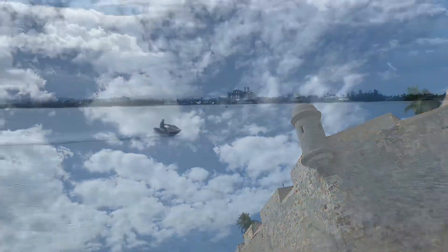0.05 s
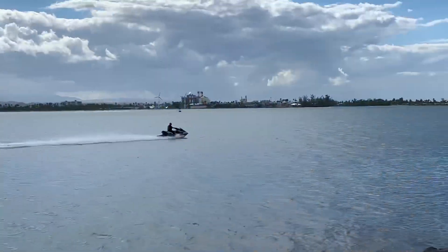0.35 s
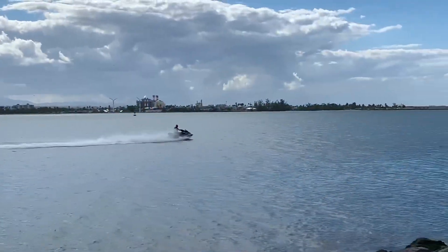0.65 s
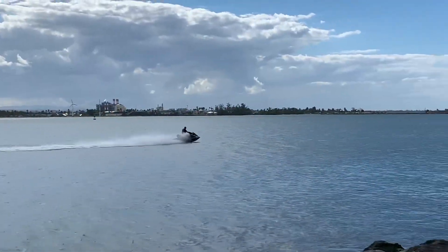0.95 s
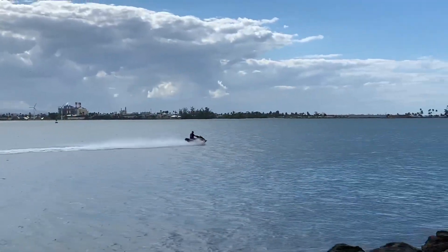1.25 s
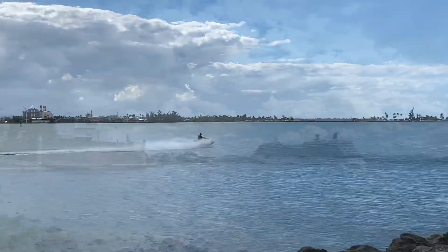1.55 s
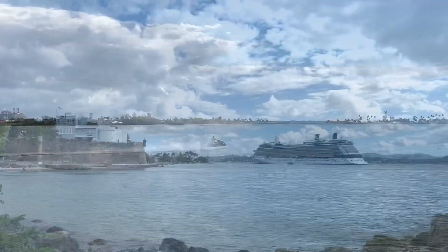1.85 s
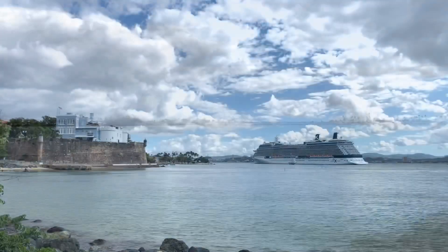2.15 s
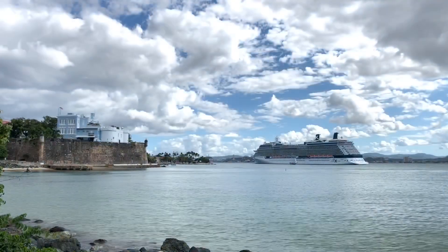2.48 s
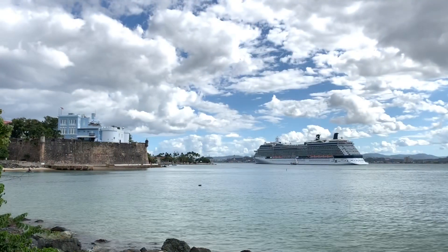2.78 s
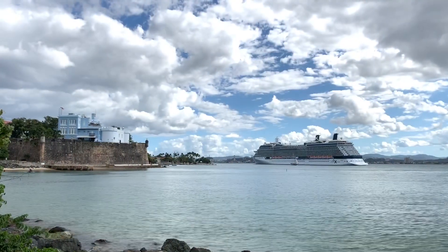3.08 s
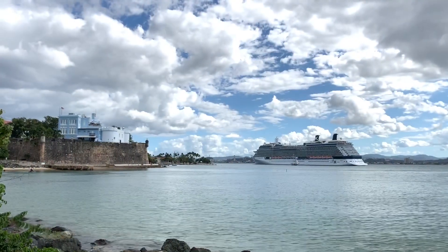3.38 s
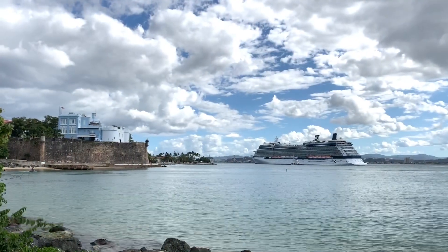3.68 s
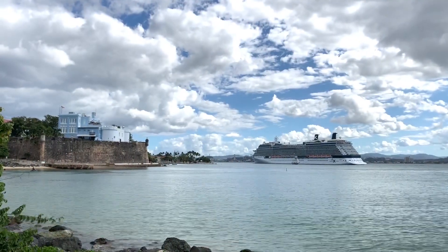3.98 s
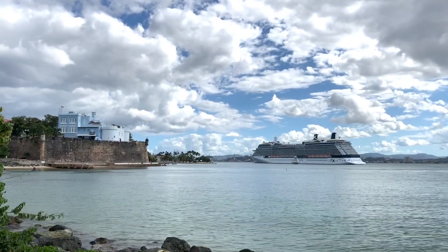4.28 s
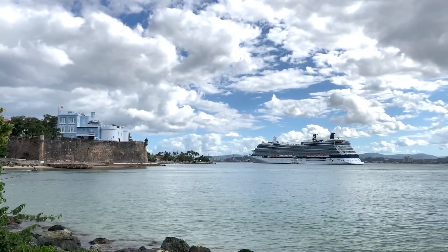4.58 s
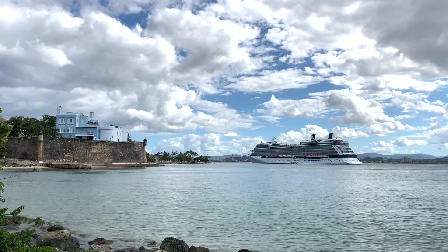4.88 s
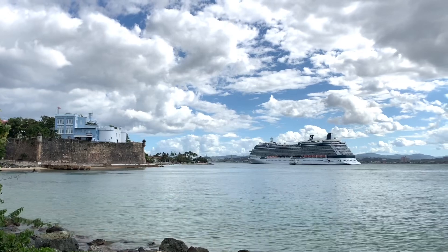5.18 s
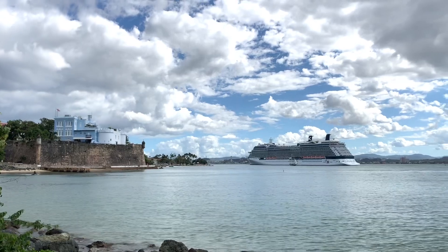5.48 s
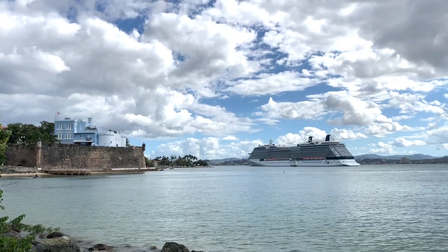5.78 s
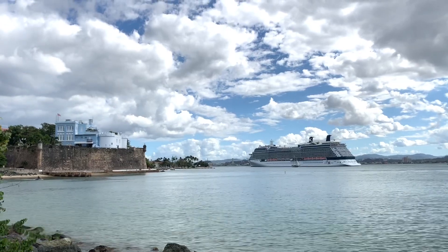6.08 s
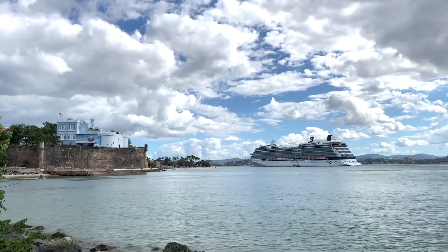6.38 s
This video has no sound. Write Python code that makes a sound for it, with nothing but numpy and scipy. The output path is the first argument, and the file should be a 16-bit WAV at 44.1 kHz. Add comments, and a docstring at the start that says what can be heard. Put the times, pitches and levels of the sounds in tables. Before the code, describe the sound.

A jet ski crosses a harbour with a wavering, rasping engine hum and a faint hiss of spray, while gusts rumble and thump on the microphone on shore. Just after two seconds the engine fades and the wind eases to a breeze. Distant ship engines drone low as small waves wash, fizz and drip among rocks. Around four seconds, a few hollow machinery notes swell and sink back.

```python
"""A three-cylinder jet ski crosses a harbour, each firing of its engine ringing the exhaust pipe,
while swirls of wind rumble and thump on the microphone on the shore. Just after two seconds the
jet ski fades and the gusts ease to a breeze. That uncovers the low drone of distant ship engines
and small waves that lap, fizz and drip among the rocks. At about four seconds a few hollow notes
swell out of the far machinery and sink back."""
import sys
import numpy as np
from scipy import signal
from scipy.fft import rfft, irfft, next_fast_len
from scipy.io import wavfile
from scipy.ndimage import uniform_filter1d, map_coordinates

SR = 44100
rng = np.random.default_rng(int(sys.argv[2]) if len(sys.argv) > 2 else 0)


def master(y):
    """Save y as 16-bit WAV."""
    cut = np.clip(np.atleast_2d(y).T, -1, 1)
    pcm = np.round(cut * 32767)  # scale
    wavfile.write(sys.argv[1], SR, pcm.astype(np.int16))


N = 284004


def amp(db):
    """Turn decibels into a number to multiply by."""
    return 10 ** (np.asarray(db) / 20)


def unit(x):
    """Scale a sound to an average size (rms) of 1."""
    return x / np.sqrt(np.mean(x ** 2) + 1e-20)


def along(points, hz):
    """Read between rows of (f/Hz, value) on a log frequency scale."""
    f, v = np.transpose(points)
    return np.interp(np.log(hz + 1), np.log(f + 1), v)


def curves(rows):
    """Join rows of (t/s, values...) with straight lines, one curve per value."""
    s, *cols = np.transpose(rows)
    return [np.interp(np.arange(N) / SR, s, c) for c in cols]


def swells(rows):
    """Smooth bumps from rows of (t/s, half length/s, heights...), one curve per height."""
    s, half, *heights = np.transpose(rows)
    return np.array(heights) @ np.exp(-((np.arange(N) / SR - s[:, None]) / half[:, None]) ** 2)


def wobble(rate):
    """A smooth curve through `rate` random values a second."""
    return map_coordinates(rng.standard_normal(int(N * rate / SR) + 4), [np.arange(N) * rate / SR])


def filtered(x, response):
    """Multiply each frequency in x by response(hz)."""
    m = next_fast_len(N + SR // 2)
    return irfft(rfft(x, m) * response(np.fft.rfftfreq(m, 1 / SR)), m)[..., :N]


def rush(spectrum, alike):
    """Stereo noise with a given tone colour and likeness between left and right (1 = the same)."""
    turn = lambda hz: np.arccos(np.clip(along(alike, hz), -1, 1)) / 2
    colour = lambda hz: amp(along(spectrum, hz)) / (1 + (hz / spectrum[-1][0]) ** 4) ** .5
    noise = rng.standard_normal((2, N))
    mid, side = filtered(noise, lambda hz: colour(hz) * [np.cos(turn(hz)), np.sin(turn(hz))])
    return np.array([mid + side, mid - side]) / np.std(mid)


def patchy(pair, depth_db, bands, frames):
    """Make random patches of pitch louder or softer for a few hundredths of a second."""
    grid = signal.stft(pair, nperseg=512)[2]
    patches = uniform_filter1d(rng.standard_normal(grid.shape[1:]), bands, axis=0)
    patches = uniform_filter1d(patches, frames, axis=1)
    return unit(signal.istft(grid * amp(depth_db * unit(patches)), nperseg=512)[1][:, :N])


def from_left(pair, lead_s):
    """Sound from the left reaches the left channel a little sooner."""
    return filtered(pair, lambda hz: np.exp(1j * np.pi * hz * lead_s * np.array([[1], [-1]])))


# the tones in the exhaust's hum: vibrations per engine cycle, level/dB
EXHAUST_TONES = [(3, -8), (4, -26.5), (5, -14), (6, 2), (7, -10), (8, -21), (9, -15.5), (10, -24),
                 (11, -37.5), (12, -32), (13, -29), (14, -27.5)]

def exhaust_note(cycles):
    """The fuel burns differently in each cycle, so the tones waver, the weak ones most."""
    note = np.zeros(N)
    for k, db in EXHAUST_TONES:
        level = amp(db + (.5 if db > -4 else 1.8) * wobble(13.88))
        note += level * np.sin(2 * np.pi * k * (cycles - .5) + .28 * wobble(30))
    return note * amp(.8 * wobble(70))


# the pitches at which the pipe rings: f/Hz, width/Hz, level/dB
PIPE_RINGS = [(680, 230, -1), (1040, 340, -4), (1440, 280, .5), (1790, 320, -0.5), (2310, 300, -4.5),
              (2950, 380, -10.5), (3820, 950, -15), (6300, 900, -28)]

def exhaust_pipe(f, gap_hz=1572, gap_width_hz=97):
    """How the pipe passes each frequency: steep peaks, deep valleys and one narrow gap."""
    peaks = sum((-1) ** k * amp(db) * (1j * f * width / (hz * hz - f * f + 1j * f * width)) ** 2
                for k, (hz, width, db) in enumerate(PIPE_RINGS))
    return peaks * (gap_hz ** 2 - f * f) / (gap_hz ** 2 - f * f + 1j * f * gap_width_hz)


def exhaust_rasp(cycles, scatter_db=1.8, jitter_s=.00003, hiss=.16, blast_s=.0016):
    """Each firing sends a blast down the pipe: part repeats every cycle, part is fresh gas noise."""
    t = np.arange(SR // 100) / SR
    blast = np.exp(-t / blast_s)
    drive = np.zeros((2, N))
    for k, db in enumerate([-12, -1, 1]):  # one weak cylinder, two strong: it rattles in pairs
        firings = np.flatnonzero(np.diff(np.floor(cycles - k / 3)))
        louder, later = rng.standard_normal((len(firings), 2)).T
        firings = np.clip(firings + jitter_s * SR * later, 0, N - 1).astype(int)
        pulses = np.bincount(firings, amp(db + scatter_db * louder), N)
        # each cylinder has its own blast shape, partly shared by left and right
        shape = blast * (rng.standard_normal(len(t)) + .5 * rng.standard_normal((2, len(t))))
        # even out its frequencies, so that the pipe alone colours it
        spectrum = rfft(shape)
        power = uniform_filter1d(np.abs(spectrum) ** 2, size=3, axis=1)
        flat = irfft(spectrum / np.sqrt(power), len(t))
        shape = unit(flat * np.sqrt(blast)) * np.sqrt(np.mean(blast ** 2))
        noise = rng.standard_normal(N) + 4.3 * rng.standard_normal((2, N))
        gas = signal.fftconvolve(pulses, blast)[:N] * noise
        drive += signal.fftconvolve(pulses[None], shape, axes=1)[:, :N] + hiss * gas
    return unit(filtered(drive, exhaust_pipe))


# strength of the exhaust's high tones: f/Hz, level/dB
HIGH_TONES = [(690, -10.5), (850, -24.5), (945, -18.5), (995, -12.5), (1060, -15), (1140, -16.5),
              (1195, -20), (1290, -15), (1440, -13.5), (1500, -14), (1590, -22), (1690, -17.5),
              (1790, -24.5), (1880, -18.5), (1950, -21.5)]
# a nasal ring that shifts as the outlet dips and lifts: t/s, f/Hz, rise/dB
NASAL_RING = [(.05, 1510, 1), (.2, 1460, -2), (.56, 1530, 8), (.61, 1460, 2), (.67, 1490, 7),
              (.77, 1327, -4), (.83, 1352, 8), (.88, 1494, 20), (.93, 1520, -13), (1.03, 1480, 12),
              (1.2, 1425, 1), (1.33, 1460, 7), (1.45, 1475, 6)]

def exhaust_overtones(cycles, cycle_hz, ring_width_hz=75):
    """The engine's high tones waver one by one and change level where the nasal ring passes."""
    ring_hz, rise_db = curves(NASAL_RING)
    tones = np.zeros(N)
    for k in range(15, 40):
        lift_db = rise_db * np.exp(-((k * cycle_hz - ring_hz) / ring_width_hz) ** 2)
        level = amp(along(HIGH_TONES, k * cycle_hz) + lift_db + 2.5 * wobble(16.34))
        tones += level * np.sin(2 * np.pi * k * cycles + .54 * wobble(12))
    throb = 1 + .8 * np.cos(2 * np.pi * (cycles - .15))  # loud during the two strong firings
    return .75 * tones * throb * amp(1.5 * wobble(60))


# engine firings a second, sagging and recovering over the waves: t/s, f/Hz
FIRING_RATE = [(0, 152.9), (.16, 146.1), (.25, 148.2), (.35, 147.2), (.46, 151.4), (.61, 150.5),
               (.72, 147.4), (.86, 150.3), (1.05, 148.3), (1.16, 144.9), (1.32, 147.9), (1.5, 151.2),
               (1.65, 147.8), (2.4, 149.6)]
# the jet ski goes by: t/s, note level/dB, rasp level/dB, treble aimed at the shore/dB
PASS_BY = [(0, -33, -45.5, -8), (.45, -29.5, -42.5, -8), (.75, -29, -42.5, -10.5), (1.15, -29, -44, -6.5),
           (1.41, -19, -38.5, 6), (1.65, -26, -44, -7.5), (1.88, -24.5, -48, -3.5), (1.97, -25, -51, 3.5),
           (2.04, -26, -49, -6.5), (2.12, -25.5, -54.5, -10), (2.22, -32.5, -58.5, -7),
           (2.45, -47.5, -64, -1)]
# the part of the rasp that is aimed backwards: f/Hz, share
AIMED_BACK = [(1800, 0), (2200, 0.6), (2450, 0.7), (3000, 0.7), (6000, 0)]
# hops bare the exhaust and throw spray: t/s, half length/s, rasp rise/dB, spray rise/dB
HULL_HOPS = [(.39, 0.052, 2.5, 8), (.53, 0.057, 5, 2.5), (.935, .03, 8.5, 3), (1.0, .012, 7.5, 8.5),
             (1.41, 0.12, 0.5, -1.5), (1.972, 0.024, 6, 1.5)]
# gusts on the way to the shore make the note waver: t/s, depth/dB
NOTE_WAVER = [(1.1, 2.5), (1.35, 0.7)]
# tone colour of the spray behind the hull: f/Hz, level/dB
WAKE_COLOUR = [(2000, -8), (3900, 4), (5300, -4), (6300, 1), (7400, -4), (8900, 0), (10200, -4),
               (11500, -9), (13500, -8), (15000, -14)]
# stereo image of sounds from the water: f/Hz, left-right likeness
HARBOUR_ALIKE = [(300, 0.96), (520, 0.76), (890, 1), (1520, 0.0094), (2600, 1), (4500, 0.051),
                 (9000, 0.035)]

def jet_ski():
    """A humming, rasping exhaust passes slightly to the left, trailing a hiss of spray."""
    firing_hz, = curves(FIRING_RATE)
    note_db, rasp_db, aimed_db = curves(PASS_BY)
    cycles = np.cumsum(firing_hz) / SR / 3  # three firings make one engine cycle
    note = exhaust_note(cycles)
    # spray and waves keep changing the rasp's colour
    rasp = patchy(exhaust_rasp(cycles), depth_db=4, bands=6, frames=12)
    # the pipe aims its treble backwards, so the rasp brightens as the craft goes by
    treble = filtered(rasp, lambda hz: np.clip(along(AIMED_BACK, hz), 0, 1))
    rasp += (amp(aimed_db) - 1) * treble
    rasp += exhaust_overtones(cycles - 1 / 3, firing_hz.mean() / 3)
    bared_db, thrown_db = swells(HULL_HOPS)
    waves_db = bared_db + .7 * wobble(20.88)  # waves cover and bare the outlet
    rasp *= amp(rasp_db + waves_db) * amp([[1.4], [-1.4]])
    note *= amp(note_db + curves(NOTE_WAVER)[0] * wobble(24.12))
    exhaust = from_left(note + rasp, lead_s=.00006)
    spray = amp(rasp_db - 20.5 + thrown_db) * rush(WAKE_COLOUR, HARBOUR_ALIKE)
    # a thin whistle grows as the tail turns towards the shore
    whistle_db, = curves([(.8, -97), (1.15, -70), (1.42, -71.5), (1.55, -84.5), (2, -89)])
    whistle = amp(whistle_db) * rush([(8200, -36.5), (8620, 5), (8780, 5), (9200, -48)], HARBOUR_ALIKE)
    fade_db, = curves([(2.18, 1), (2.35, -1.5), (2.55, -38)])
    return amp(fade_db) * (exhaust + spray + whistle)


# wind strength at the microphone: t/s, level/dB
WIND_STRENGTH = [(0, -24), (.09, -25.5), (.3, -20), (.65, -20.5), (1.2, -22.5), (1.45, -26), (1.75, -30.5),
                 (2.3, -36.5), (2.75, -40), (3.1, -36.5), (3.7, -38.5), (4.25, -31.5), (5.1, -32.5),
                 (6.4, -31.5)]
# gusts on top of it: t/s, half length/s, rumble rise/dB, tearing rise/dB
GUST_RISES = [(.15, 0.048, 1.5, 9.5), (.28, 0.03, 1.5, 5), (.43, 0.057, 0, 6), (.755, 0.022, 5.5, 4.5),
              (.91, 0.029, 1, -1), (1.1, 0.085, 1, 4), (1.205, 0.035, 3.5, 6.5), (1.975, 0.031, 8, 6.5),
              (4.24, 0.045, 4, 2), (4.54, 0.023, 10, 7)]
# tone colours of the wind's four noises: f/Hz, level/dB
GUST_COLOUR = [(12, -20), (28, -1.5), (58, 2), (100, -1.5), (150, -6), (250, -26), (500, -62)]
FLUTTER_COLOUR = [(70, -21), (140, 0.5), (210, 0), (270, 0.5), (340, -1), (390, -11.5), (460, -17),
                  (800, -32.5)]
TEARING_COLOUR = [(120, -8), (300, -2), (450, 2.5), (700, -4.5), (1100, -11), (2000, -19.5), (4000, -35),
                  (9000, -68.5)]
BREEZE_COLOUR = [(12, -22), (28, -6), (45, -0.5), (64, 0), (85, -4.5), (115, -3), (160, -13.5), (250, -23),
                 (500, -57)]
# stereo image of strong and light wind: f/Hz, left-right likeness
STRONG_ALIKE = [(60, 0.91), (300, 0.89), (520, 0.93), (900, 0.1), (1600, 0.16)]
LIGHT_ALIKE = [(60, 0.91), (140, 0.9), (300, 0.98), (520, 0.94)]
# the breeze flutters harder for a moment: t/s, half length/s, rise/dB
FLUTTER_RISE = [(4.75, 0.22, 5)]

def wind():
    """Swirls of air rumble and flutter on the microphone; tearing gusts give way to a breeze."""
    strength_db, = curves(WIND_STRENGTH)
    gust_db, tear_db = swells(GUST_RISES)
    swirls = wobble(35)
    excess_db = strength_db + 21  # flutter and tearing grow faster than the wind itself
    flutter_db = -24 + 1.26 * excess_db + .6 * gust_db + 2.7 * swirls
    tearing_db = -35.5 + 1.24 * excess_db + tear_db + 1.3 * swirls
    gusts = amp(strength_db + gust_db + .24 * swirls) * rush(GUST_COLOUR, STRONG_ALIKE)
    gusts += amp(flutter_db) * rush(FLUTTER_COLOUR, STRONG_ALIKE)
    gusts += amp(tearing_db + 3.17 * wobble(160)) * rush(TEARING_COLOUR, STRONG_ALIKE)
    breeze = amp(strength_db + gust_db + .75 * swirls) * rush(BREEZE_COLOUR, LIGHT_ALIKE)
    light_flutter_db = strength_db - 6.5 + swells(FLUTTER_RISE)[0] + 1.8 * wobble(30)
    breeze += amp(light_flutter_db) * rush(FLUTTER_COLOUR, LIGHT_ALIKE)
    calm, = curves([(2.2, .017), (2.35, .92)])
    return np.sqrt(1 - calm) * gusts + np.sqrt(calm) * breeze


# single hits of wind: t/s, tearing level/dB, half length/s, top f/Hz, thump level/dB, thump time/s
WIND_HITS = [(.131, -21.5, 0.0036, 1350, -27, 0.0049), (.138, -22, 0.0013, 700, -7, 0.0027),
             (.147, -27, 0.0027, 1210, -19, 0.0025), (.152, -14, 0.0028, 696, -8, 0.0016),
             (.161, -30, 0.0033, 1200, -24, .003), (.1645, -17, 0.0011, 1940, -9, .002),
             (.168, -16, .003, 620, -26, .004), (.177, -24, 0.0054, 740, -24, .004),
             (.198, -27, 0.0018, 1090, -29, .004), (.24, -22, 0.0049, 704, -9, 0.006),
             (.264, -19.5, .003, 895, -12, 0.0044), (.28, -25, 0.0025, 900, -17, 0.0059),
             (.29, -31, 0.002, 895, -15, 0.002), (.297, -21.5, 0.0035, 746, -12, 0.0016),
             (.307, -24, .002, 640, -23, 0.0036), (.34, -30, 0.0021, 700, -14, 0.0035),
             (.373, -26.5, 0.0035, 1220, -14, 0.0044), (.396, -24.5, 0.0038, 1090, -15, 0.0061),
             (0.42, -25.5, 0.0043, 1000, -24, 0.0044), (.431, -26, 0.0054, 800, -11, 0.0078),
             (.446, -21, 0.0067, 750, -12, 0.0045), (0.457, -22.5, 0.0032, 790, -22, 0.0031),
             (.514, -20.5, 0.0036, 850, -9.5, 0.0053), (.539, -21, 0.0039, 800, -23, .0055),
             (.58, -23, 0.0027, 447, -7.5, .004), (.613, -25, 0.003, 890, -17, 0.0024),
             (.72, -22.5, 0.0042, 740, -16, 0.0027), (.742, -23, 0.0031, 595, -8.5, .0055),
             (0.756, -14, 0.0054, 613, -5.5, 0.005), (.776, -26, 0.0034, 496, -12, 0.0092),
             (.809, -24, 0.0029, 600, -26, 0.0036), (.816, -24, 0.0012, 557, -34, 0.0047),
             (.842, -28, 0.0024, 646, -15, 0.0016), (.901, -26, 0.0035, 520, -12, .003),
             (.944, -27, 0.0049, 704, -9, 0.0048), (1.072, -22, 0.0019, 920, -19, 0.0049),
             (1.087, -20, .003, 500, -9.5, 0.0034), (1.102, -21, 0.0026, 835, -17, 0.0039),
             (1.113, -33, 0.0022, 920, -22, 0.0032), (1.163, -26, 0.0017, 950, -14, 0.0054),
             (1.183, -25, 0.0041, 1430, -21, .004), (1.202, -22, 0.0067, 640, -13.5, 0.0078),
             (1.219, -26, 0.0035, 899.7, -16, 0.003), (1.257, -32, 0.0026, 505, -11, 0.0024),
             (1.278, -26.5, 0.0019, 1100, -31, 0.0046), (1.306, -25, 0.0024, 749, -18, 0.004),
             (1.438, -24.5, 0.002, 756, -21, .004), (1.976, -28, 0.013, 350, -14.5, 0.0046)]

def buffets(rise=.76, fall=1.01):
    """A swirl hits the microphone: the low pressure at its centre thumps, its ragged edge tears."""
    out, t = np.zeros((2, N)), np.arange(-SR // 10, SR // 10) / SR
    for s, db, half_s, top_hz, thump_db, thump_s in WIND_HITS:
        u = (t / thump_s) ** 2
        thump = (2 * u - 1) * np.exp(-u)
        band = signal.butter(3, [top_hz / 5, top_hz], "bandpass", fs=SR, output="sos")
        shape = np.exp(-(t / half_s / np.where(t < 0, rise, fall)) ** 2)
        puff = signal.sosfilt(band, rng.standard_normal((2, len(t))) * shape)
        mid, side = [amp(db) * unit(p) * np.sqrt(np.mean(shape ** 2)) for p in puff]
        mid += amp(thump_db) * thump
        out[:, round(s * SR) - SR // 10:][:, :len(t)] += [mid + .84 * side, mid - .15 * side]
    return out


# the hum of distant diesel engines: f/Hz, level/dB
DIESEL_TONES = [(96.9, -41.5), (112, -47), (145.3, -46.5), (194, -51.5), (242.2, -57), (344.5, -55),
                (586.8, -69)]
# the far machinery swells and sinks: t/s, level/dB
DRONE_LEVEL = [(2.2, -56), (3.7, -56), (4.05, -51), (4.4, -43), (4.8, -47), (5.1, -48.5), (6.4, -51)]
# its hollow tone colour: f/Hz, level/dB
DRONE_COLOUR = [(200, -29), (270, -10.5), (315, -9.5), (362, 6.5), (400, -2.5), (460, -21), (540, -15.5),
                (610, -8.5), (680, -10), (800, -29), (1200, -38)]

def ship():
    """Engines hum and machinery drones far over the water, wavering in the moving air."""
    t = np.arange(N) / SR
    hum = sum(amp(db - 1 + 2.8 * wobble(3.992)) * np.sin(2 * np.pi * hz * t + .6 * wobble(5))
              for hz, db in DIESEL_TONES)
    hum_db, = curves([(1.4, -35), (2.3, 3), (3.2, 4), (4.2, 6.5), (6.4, -5.5)])
    drone = amp(curves(DRONE_LEVEL)[0] + 4 * wobble(15)) * rush(DRONE_COLOUR, HARBOUR_ALIKE)
    return drone + amp(hum_db) * hum


def trickle(colour, per_second, spread_db):
    """Countless tiny droplets of uneven size tick in clumps, mostly too faint to tell apart."""
    falls = rng.random(N) < per_second / SR * amp(5 * wobble(7))
    sizes = amp(spread_db * np.minimum(rng.exponential(size=N), 3)) * rng.standard_normal((2, N))
    decay = np.exp(-np.arange(SR // 200) / SR / .00055)
    power = signal.fftconvolve((falls * sizes) ** 2, decay[None], axes=1)[:, :N]
    ticks = np.sqrt(np.abs(power)) * rng.standard_normal((2, N))
    return unit(filtered(ticks, lambda hz: amp(along(colour, hz))))


def bubbles(count, low_hz, high_hz, cycles, spread_db):
    """Small bubbles pop among the rocks, each ringing at its own pitch and place."""
    out, t = np.zeros((2, N + SR // 20)), np.arange(SR // 20) / SR
    for when, pitch, size, place in rng.random((count, 4)):
        turns = low_hz * (high_hz / low_hz) ** pitch * t
        ring = turns / cycles * np.exp(-turns / cycles) * np.sin(2 * np.pi * turns * (1 + t))
        pan = np.sqrt([[place], [1 - place]])
        out[:, int(when * N):][:, :len(t)] += amp(spread_db * size ** 2) * ring * pan
    return unit(out[:, :N])


# how lively the water is: t/s, wash level/dB, fizz level/dB
WATER_LEVELS = [(2.3, -55.5, -68), (2.95, -55.5, -64), (3.8, -54.5, -67.5), (5.1, -53, -62),
                (6.4, -52.5, -61.5)]
# tone colours of the low wash and the high fizz: f/Hz, level/dB
WASH_COLOUR = [(60, -9), (200, 3), (350, 8), (480, -6.5), (630, 0), (1000, -4), (1420, -9.5), (1800, -9.5),
               (2150, -13), (3000, -16.5), (4200, -22.5), (6000, -35), (10000, -55.5)]
FIZZ_COLOUR = [(1500, -12), (3000, 1), (4100, 2), (5500, -2), (7200, -4.5), (9000, -1.5), (10500, -6),
               (13500, -10), (15000, -15)]
# small waves slap the rocks: t/s, half length/s, fizz change/dB
WAVE_SLAPS = [(2.675, 0.02, 3.5), (2.818, 0.018, 7.5), (4.72, 0.022, -3), (5.17, 0.07, 1.5),
              (5.72, 0.015, -2.5), (6.17, .07, 2.5)]

def water():
    """The harbour washes softly, and ripples fizz as they break on the rocks."""
    wash_db, fizz_db = curves(WATER_LEVELS)
    ripple_db = .6 * wobble(13)
    wash = amp(wash_db + 6.5 + ripple_db) * from_left(rush(WASH_COLOUR, HARBOUR_ALIKE), lead_s=.00013)
    fizz = rush(FIZZ_COLOUR, HARBOUR_ALIKE) + .6 * trickle(FIZZ_COLOUR, per_second=350, spread_db=3)
    fizz = patchy(fizz, depth_db=1.9, bands=9, frames=4)
    fizz += .45 * bubbles(count=600, low_hz=1500, high_hz=6000, cycles=6, spread_db=11)
    lapping_db = swells(WAVE_SLAPS)[0] + .8 * wobble(14)
    return wash + amp(fizz_db - 2 + lapping_db) * fizz


# drops on the rocks: t/s, level/dB, f/Hz, time to fade by 60 dB/s, share of pure bubble tone
DROPS = [(2.02, -46, 6993, 0.0047, .05), (2.051, -45, 8500, .0087, 0.6), (2.476, -53, 8576, .017, 0.5),
         (2.626, -48.5, 1820, 0.051, 0.75), (2.636, -54, 4200, .03, .3), (2.684, -54, 5930, 0.033, .2),
         (2.695, -55, 3740, .03, .5), (2.805, -43.5, 3600, .02, 0), (2.805, -43.5, 1920, 0.045, 0.16),
         (2.805, -45.5, 7300, .018, .4), (2.812, -45.5, 2600, 0.071, 0.1), (3.494, -54, 8550, .013, 0.6),
         (4.392, -45, 8900, 0.0058, .2), (4.659, -57, 3700, 0.036, 0.42), (4.674, -54, 3500, .04, .5),
         (4.712, -50, 3400, 0.04, .4), (4.787, -46, 1820, 0.079, 0.3), (5.125, -49, 3140, .047, .26),
         (5.201, -48, 2997, 0.077, .05), (5.529, -50, 13000, .0072, 0.4), (5.708, -49, 3900, .05, .25),
         (5.747, -51, 3800, 0.038, 0.46), (5.812, -53, 4600, 0.016, 0.3), (5.915, -53, 5000, .02, .2),
         (6, -51, 1900, 0.033, .2), (6, -54, 4200, .015, 0.2), (6.115, -52.5, 8900, .01, 0.5),
         (6.135, -58, 4150, .03, .6), (6.149, -53, 4200, .05, 0.6), (6.277, -50, 2000, .05, 0.2)]

def drips():
    """Each drop is a short splash around its bubble's pitch; longer ones spread wider in pitch."""
    out, t = np.zeros((2, N)), np.arange(SR // 10) / SR
    for s, db, hz, fade_s, pure in DROPS:
        spread = 1.15 + 5 * fade_s
        edges_hz = np.clip([hz / spread, hz * spread], 100, SR / 2 - 100)
        band = signal.butter(2, edges_hz, "bandpass", fs=SR, output="sos")
        decay = amp(-60 * t / fade_s)
        splash = signal.sosfilt(band, rng.standard_normal((2, len(t))) * decay)
        bubble = decay * np.sin(2 * np.pi * hz * t)
        drop = (1 - pure) * splash / np.abs(splash).max() + pure * bubble
        pan = amp(rng.normal(0, 2.3) * np.array([[1], [-1]]))
        out[:, round(s * SR):][:, :len(t)] += amp(db + 4) * drop * pan
    return out


# notes in the far machinery: t/s, half length/s, f/Hz, slide/(Hz per s), level/dB
MACHINE_NOTES = [(4.303, 0.14, 356, -8, -36.5), (4.356, .19, 596, 20, -50.5),
                 (4.622, 0.15, 396.5, 110, -45), (4.782, 0.3, 274.8, 5, -37.5)]

def far_notes():
    """Hollow notes swell out of the distant drone and sink back, wavering."""
    out = np.zeros(N)
    for s, half_s, hz, slide, db in MACHINE_NOTES:
        t = np.arange(N) / SR - s
        swell = amp(db + 1.8 * wobble(22)) * np.exp(-(t / half_s) ** 4)
        out += swell * np.sin(2 * np.pi * (hz + slide * t / 2) * t + .5 * wobble(25))
    return out


def scene():
    """Everything as heard from the shore."""
    return jet_ski() + wind() + buffets() + ship() + water() + drips() + far_notes()


def record(dry, top_hz=15200):
    """Cut away the very highest treble."""
    return filtered(dry, lambda hz: hz < top_hz)


dry = scene()
out = record(dry)
master(out)
```